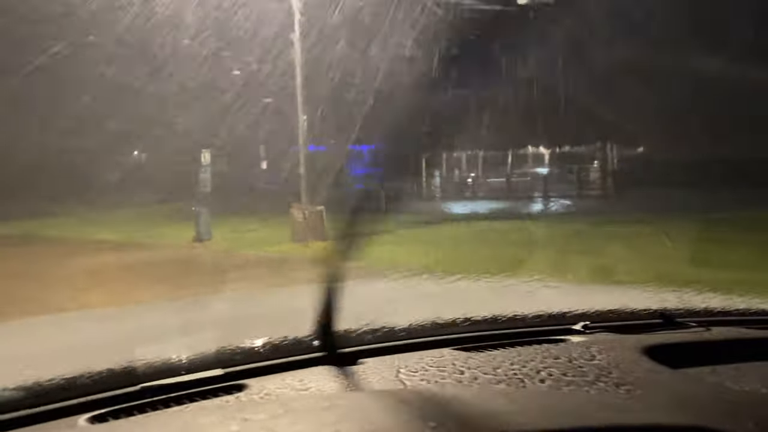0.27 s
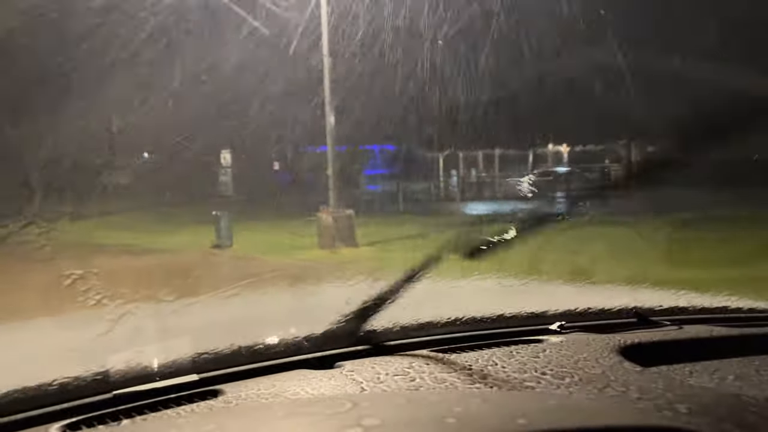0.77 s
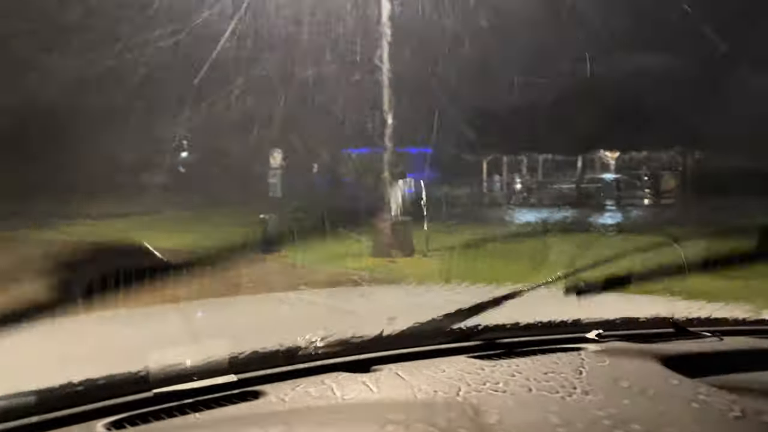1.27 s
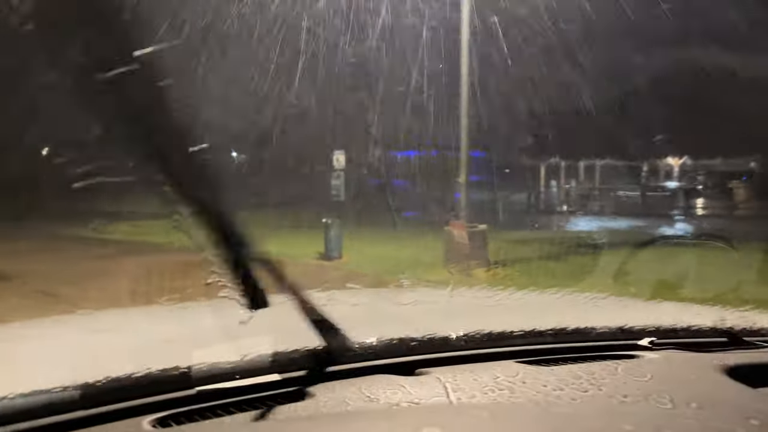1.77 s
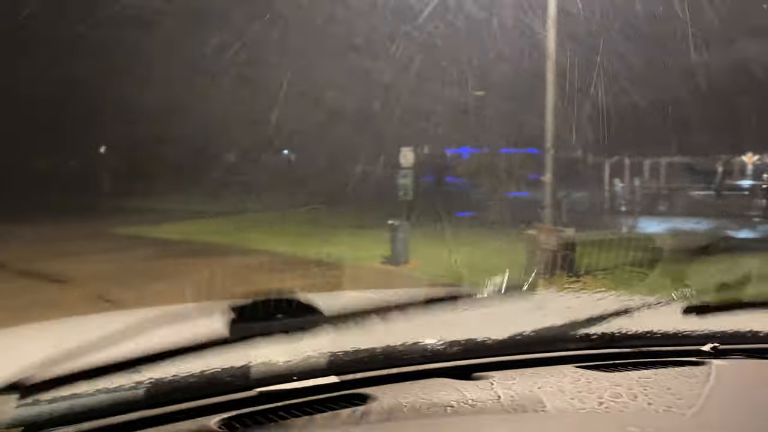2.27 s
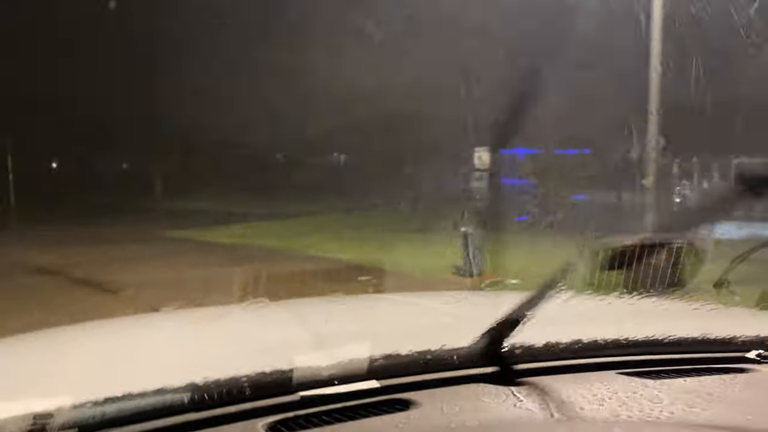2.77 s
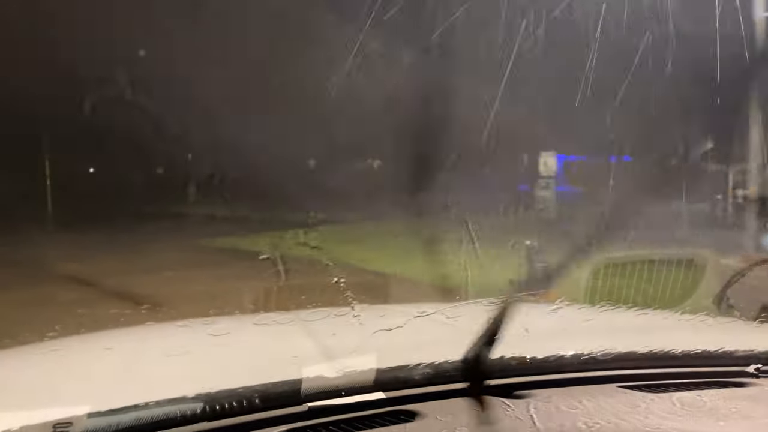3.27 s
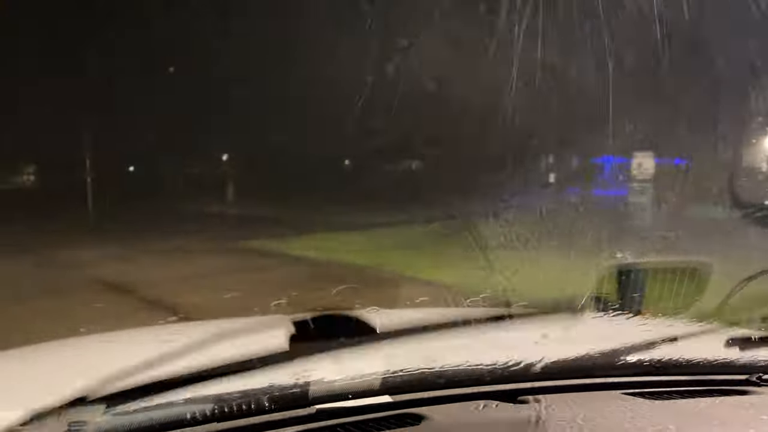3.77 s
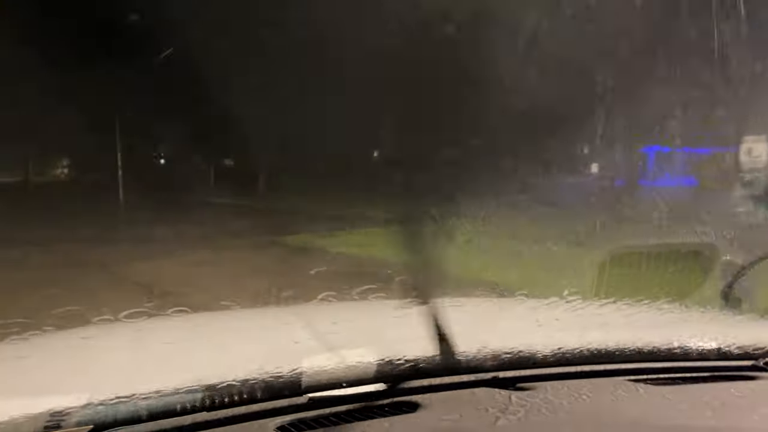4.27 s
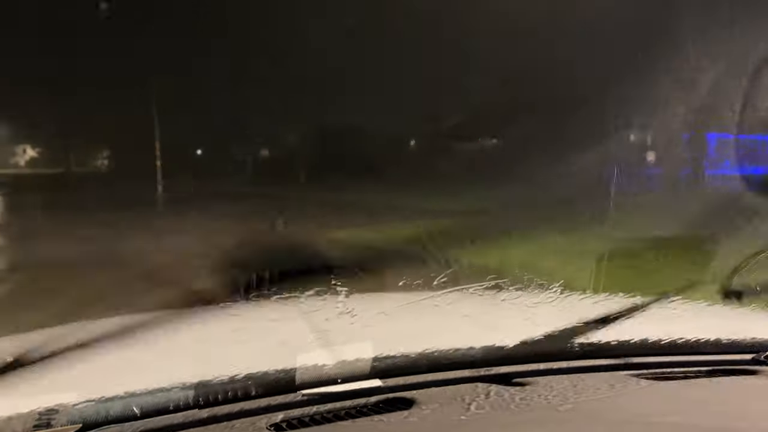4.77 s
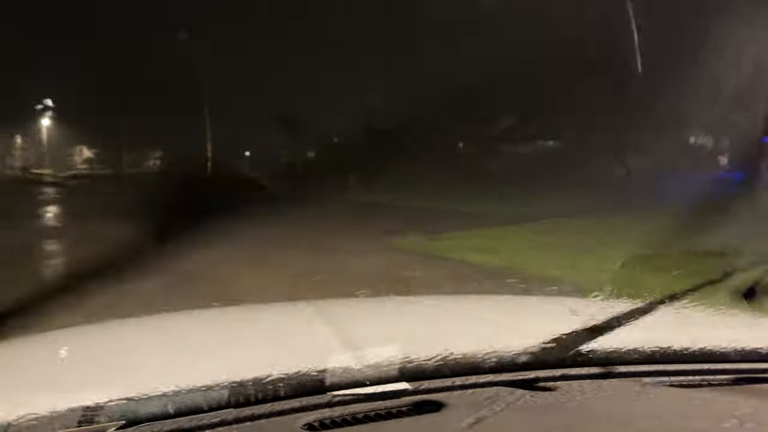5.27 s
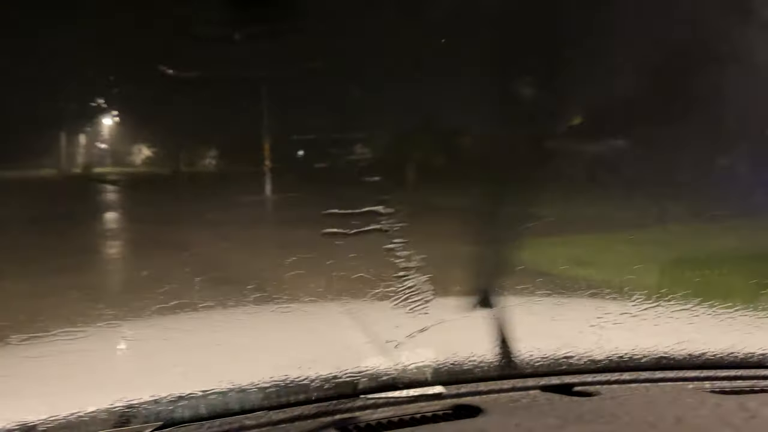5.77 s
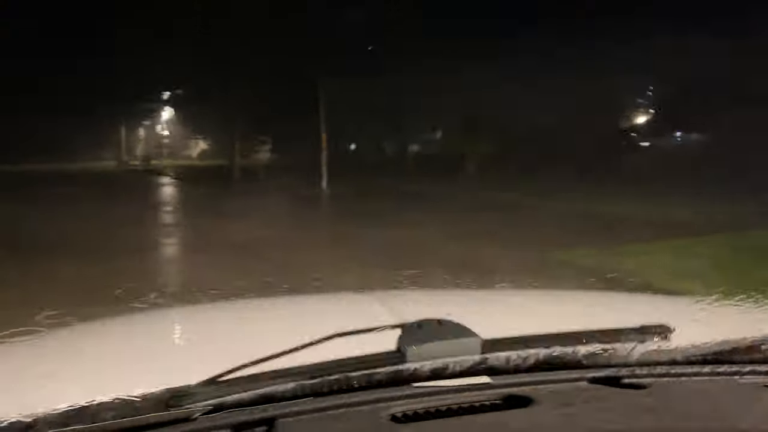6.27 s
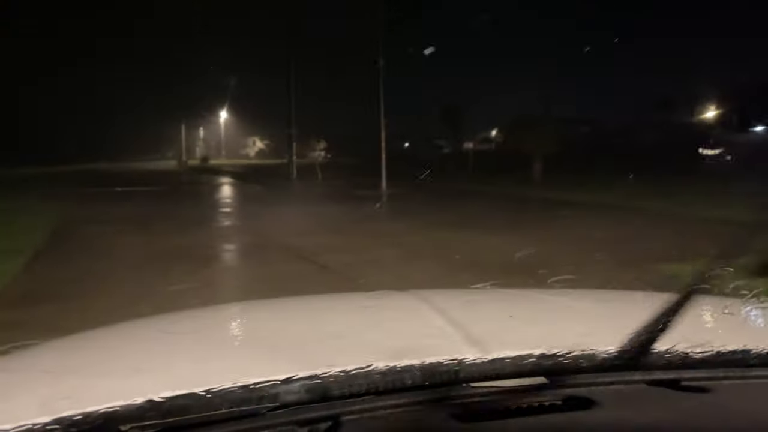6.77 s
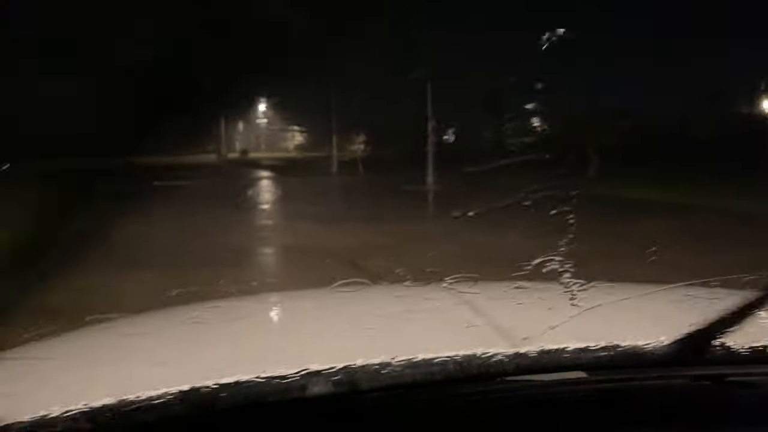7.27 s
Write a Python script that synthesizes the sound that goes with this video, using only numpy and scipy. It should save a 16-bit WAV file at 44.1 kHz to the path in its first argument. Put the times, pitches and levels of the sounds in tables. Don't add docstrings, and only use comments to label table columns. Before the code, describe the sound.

Heard from inside a car creeping through a night storm, with close stereo microphones facing the windscreen. At 0 s a sheet of water drums on glass and roof, draining off within half a second into dense, bright, spattering rain with sharp large drops. Underneath, a steady deep engine drone near 38 Hz and its octave booms in uneven wind buffets, with broad cabin rumble, light engine knocking that grows over two seconds and a very faint high whine. Wipers give soft, dull thuds: single at about 0.5, 1.8, 3.2, 4.4, 5.7 and 7.1 s; paired near 1.1, 2.4, 3.7, 5.0 and 6.3 s. Rain thins from 1.5 s, quietest around 3 s, leaving separate ticks. After 4 s, hissing gusts throw sheets of water again; a strong buffet booms at 5.2 s, drops crowd near 6 s, rain peaks around 6.2 s, then eases by 7.5 s.

```python
import sys
import numpy as np
from scipy import signal
from scipy.fft import rfft, irfft, next_fast_len
from scipy.io import wavfile
from scipy.ndimage import uniform_filter1d

SR = 44100
rng = np.random.default_rng(int(sys.argv[2]) if len(sys.argv) > 2 else 0)


def dump_mix(stems):
    frames = np.atleast_2d(stems).T
    limited = np.clip(frames, -1, 1)
    pcm = np.round(limited * 32767).astype(np.int16)
    wavfile.write(sys.argv[1], SR, pcm)


def ratio(d):
    e = np.asarray(d, float) / 20
    return 10 ** e


N = 332514
SIZE = next_fast_len(N + 8192, True)
BINS_HZ = np.fft.rfftfreq(SIZE, 1 / SR)

# frequency in Hz, level in dB.
RUMBLE_COLOUR = [(30, -57), (52, 2), (90, -8), (200, -8), (300, -9), (430, -15.5), (700, -21),
                 (1000, -19.5), (1500, -23), (1850, -32), (2300, -31.5), (3000, -35.5), (4500, -77),
                 (7000, -72)]
# frequency in Hz, width in Hz, level in dB.
PANEL_MODES = [(262, 53, -3), (334, 18, 4), (630.6, 17, 7), (730, 70, 6), (1605, 120, 0.5),
               (2190, 130, -1.5)]
# frequency in Hz, width in Hz, level in dB.
PAN_MODES = [(118.8, 25.7, 1.5), (138.8, 38.6, -4)]

# time in seconds, firing rate in Hz, level in dB.
ENGINE_IDLE = [(0.0, 37.916, -29.6), (0.63, 38.522, -28.1), (1.26, 38.303, -28.7), (1.88, 38.376, -27.7),
               (2.51, 38.305, -27.5), (3.14, 38.179, -27.6), (3.77, 38.404, -27.5), (4.4, 38.385, -27.8),
               (5.03, 38.73, -28.5), (5.65, 38.633, -29.5), (6.28, 37.939, -26.6), (6.91, 38.069, -26.5),
               (7.54, 38.055, -27.0)]
# multiple of the firing rate, rms level in dB, wander in dB, phase in radians.
UPPER_ORDERS = [(3, -34.5, -3.5, -0.15), (4, -43, -2, 3), (6, -42.5, 4, 0.96)]
# start in seconds, length in seconds, peak level in dB.
BUFFETS = [(-0.01, 0.15, -21.07), (0.139, 0.2, -15.5), (0.35, 0.22, -18.5), (0.586, 0.16, -17.5),
           (0.718, 0.32, -18.05), (1.045, 0.28, -19.5), (1.274, 0.27, -20.5), (1.49, 0.21, -23.5),
           (1.668, 0.2, -17.84), (1.803, 0.52, -21), (2.31, 0.2, -22), (2.465, 0.23, -19.5),
           (2.71, 0.23, -16), (2.96, 0.21, -15.5), (3.122, 0.56, -18.94), (3.607, 0.4, -21),
           (3.91, 0.33, -23.77), (4.189, 0.26, -18.5), (4.402, 0.38, -20.47), (4.703, 0.27, -22.5),
           (4.915, 0.276, -18.5), (5.177, 0.22, -12), (5.349, 0.32, -14.26), (5.635, 0.34, -20.5),
           (5.924, 0.18, -17.02), (6.07, 0.49, -20), (6.462, 0.23, -16.5), (6.688, 0.2, -16),
           (6.888, 0.19, -18.5), (7.03, 0.56, -20)]
# level in dB, factor on the block frequencies.
CYLINDERS = [(-14, 1.07), (0, 1.0), (-1.5, 1.003), (-1, 1.008), (-4, 1.03), (-10, 1.08)]
# frequency in Hz, width in Hz, level in dB,
# delay at the left port in samples, delay at the right port in samples.
BLOCK_MODES = [(1398, 24, .5, 0, 6), (750, 35, -3, 0, 20), (612, 30, -3, 30, 0), (1260, 35, -10, 5, 0),
               (950, 150, 1, 0, 12)]
# frequency in Hz, width in Hz, level in dB.
ALTERNATOR = (5030, 70, -64)

# time in seconds, peak level in dB, low ring in dB,
# rattle length in seconds, off-centre share from 0 to 1.
FAR_THUDS = [(0.537, -14.5, -0.5, 0.036, 0.46), (1.832, -17.5, 5.5, 0.02, 0.4),
             (3.152, -13.5, -1.5, 0.028, 0.44), (4.445, -13.5, 2, 0.044, 0.27),
             (5.74, -14.5, 4, 0.049, 0.28), (7.052, -16, 6, 0.062, 0.27)]
# time in seconds, peak level in dB, low ring in dB,
# rattle length in seconds, off-centre share from 0 to 1.
NEAR_THUDS = [(1.051, -14, -10, 0.061, 0.23), (1.198, -14, -4, 0.094, 0.2), (2.338, -15, -7.5, 0.096, 0.25),
              (2.498, -12.5, -8.5, 0.067, 0.23), (3.658, -13, -16, 0.053, 0.2),
              (3.813, -14, 0, 0.055, 0.14), (4.949, -13.5, -11, 0.082, 0.18),
              (5.109, -11.5, -6.5, 0.078, 0.16), (6.277, -14.5, -3.5, 0.061, 0.19),
              (6.434, -10.5, -0.5, 0.055, 0.14)]
# frequency in Hz, width in Hz, level in dB.
COWL_LOW_MODES = [(136.7, 18.2, 0)]
# frequency in Hz, width in Hz, level in dB.
COWL_MODES = [(228.7, 79, 5.5), (281.5, 43, 2), (331.5, 37.5, 2.5), (417, 60, -6), (544, 98, -8.5),
              (693, 160, -14)]

# time in seconds, peak level in dB.
LARGE_DROPS = [(0.2294, -27), (0.33, -23.5), (0.4515, -23), (0.55, -23), (0.8454, -20.5), (0.894, -27),
               (0.9333, -25), (1.058, -27), (1.2044, -22), (1.924, -29), (2.0664, -24), (2.145, -28),
               (2.8133, -31.5), (3.8641, -26), (4.0102, -24), (4.17, -24), (4.3707, -23), (4.754, -21.5),
               (4.8708, -32.5), (5.3043, -21.5), (5.39, -20), (5.4924, -27), (5.658, -23), (5.8857, -21),
               (5.961, -19), (5.9852, -19), (6.0155, -18), (6.2763, -23), (6.6976, -31), (7.0227, -19.5)]
# time in seconds, peak level in dB.
LULL_DROPS = [(1.595, -31), (1.811, -38), (2.299, -37), (2.5262, -39), (2.6265, -33), (2.7, -36),
              (3.149, -37), (3.1862, -36), (3.248, -35), (3.329, -32), (3.801, -40)]
# time in seconds, level in dB.
STORM = [(0.0, -34), (0.2, -43.5), (0.38, -42.5), (1.3, -46.5), (1.75, -49.5), (2.2, -47.5), (2.6, -48.5),
         (3.0, -55.5), (3.3, -47.5), (3.97, -48.5), (4.03, -43), (4.6, -44), (5.2, -44.5), (5.95, -40.5),
         (6.25, -38), (6.7, -41.5), (7.3, -43.5), (7.54, -48.5)]
# centre in seconds, spread in seconds, dB above the storm.
SHEETS = [(0.19,0.055,6), (0.45,0.027,2.5), (0.65,0.067,5.5), (0.81,0.027,3), (0.88,0.015,-2),
          (0.94,0.04,6), (1.03,0.065,4), (1.22,0.059,5.5), (1.52,0.11,4.5), (1.8,0.015,3.5), (1.97,0.042,4),
          (2.3,0.012,3), (3.19,0.044,-4), (3.35,0.023,3), (4.12,0.014,5), (4.22,0.042,5), (4.4,0.074,5),
          (4.73,0.02,3.5), (5.03,0.098,3), (5.3,0.14,4.5), (5.41,0.013,1.5), (5.71,0.051,4.5),
          (5.88,0.051,3.5), (5.945,0.016,-7), (6.12,0.032,6), (6.44,0.028,2), (6.82,0.044,6),
          (6.94,0.036,4.5), (7.04,0.021,4.5), (7.45,0.054,3.5)]
# frequency in Hz, level in dB.
GLASS_COLOUR = [(250, -26), (500, -12), (1200, -1), (2500, 1), (4000, -4.5), (6000, -10), (6900, -18),
                (8000, -12.5), (10500, -22.5), (11200, -23), (11800, -59)]
# frequency in Hz, level in dB.
ROOF_COLOUR = [(250, -2), (500, 2), (1000, -2), (2000, -26.5), (3200, -39)]
# frequency in Hz, level in dB.
FIZZ_COLOUR = [(5000, -10), (8000, -5), (10800, -0.5), (11500, -3), (12300, -13.5), (12700, -31),
               (13400, -33)]

# frequency in Hz, share from 0 to 1.
DIRECT_SHARE = [(60, .99), (140, .92), (310, .78), (500, .3), (1700, .12), (2300, .52), (4000, .77),
                (5400, .42), (6300, .7), (6900, .4), (8500, .95), (10200, .995), (11450, .83), (11900, .96)]
# frequency in Hz, lead of the left port in radians.
LEFT_LEAD = [(1600, 0), (2300, .3), (3100, 1.1), (4300, .5), (5200, .8), (6900, .15), (7500, 1.0),
             (8700, 0), (9200, -1.1), (10200, -3.14), (11700, -6.283)]
# frequency in Hz, left minus right in dB.
LEFT_TILT = [(90, -.3), (140, 2), (310, .5), (700, 0), (1600, -1.5), (2420, 0), (3640, 2.5), (5000, 4),
             (7000, 3), (8000, .3), (9000, 0)]


def evened(x):
    return x / np.sqrt(np.mean(x ** 2) + 1e-20)


def read(points, hz):
    f, value = np.transpose(points)
    return np.interp(np.log(hz + 1), np.log(f + 1), value)


def along(rows):
    s, *columns = np.transpose(rows)
    return [np.interp(np.arange(N) / SR, s, column) for column in columns]


def drift(rate_hz):
    slow = signal.butter(2, rate_hz, fs=SR, output="sos")
    return evened(signal.sosfilt(slow, rng.standard_normal(N)))


def coloured(x, points):
    return evened(irfft(rfft(x, SIZE) * ratio(read(points, BINS_HZ)), SIZE)[:N])


def ring(x, hz, width):
    turn = np.exp(2j * np.pi * hz * np.arange(x.shape[-1]) / SR)
    r = np.exp(-np.pi * width / SR)
    return 2 * (turn * signal.lfilter([1 - r], [1, -r], x / turn)).real


def add(mix, s, sound):
    part = mix[..., round(s * SR):][..., :sound.shape[-1]]
    part += sound[..., :part.shape[-1]]


def ports(x, t60):
    t = np.arange(8192) / SR
    tails = rng.standard_normal((2, len(t))) * ratio(-60 * t / t60)
    tails = rfft(tails / np.linalg.norm(tails, axis=1, keepdims=True), SIZE)
    share = read(DIRECT_SHARE, BINS_HZ)
    half = np.array([[.5], [-.5]])
    direct = np.sqrt(share) * np.exp(1j * half * read(LEFT_LEAD, BINS_HZ))
    paths = direct + np.sqrt(1 - share) * tails
    balance = ratio(half * read(LEFT_TILT, BINS_HZ))
    return irfft(rfft(x, SIZE) * paths * balance, SIZE)[:, :N]


def rumble():
    body, pan = np.zeros((2, N)), np.zeros((2, N))
    for _ in range(4):
        x = coloured(rng.standard_normal(N), RUMBLE_COLOUR)
        push = rng.standard_normal(N)
        x = x + sum((ratio(db) - 1) * ring(x, hz, width) for hz, width, db in PANEL_MODES)
        body += ports(x * ratio(1.3 * drift(9.0)), .2)
        boom = sum(ratio(db) * ring(ring(push, hz, w), hz, 2 * w) for hz, w, db in PAN_MODES)
        pan += ports(boom, .2)
    pan_db = -30 - 0.29 * (along(STORM)[0] + 47) + 1.5 * drift(3.3)
    return ratio(-30) * evened(body) + ratio(pan_db) * evened(pan)


def buffets():
    t = np.arange(0, N, 64) / SR
    arches = np.zeros(len(t))
    for s, length, db in BUFFETS:
        arch = abs(np.sin(np.pi * np.clip((t - s) / length, 0, 1)))
        arches += ratio(db) * arch ** 0.71
    return np.interp(np.arange(N) / SR, t, arches)


def knock(turns):
    firing = np.floor(turns - .14)
    at = np.flatnonzero(np.diff(firing))
    cylinder = firing[at + 1].astype(int) % len(CYLINDERS)
    scatter = rng.standard_normal((len(at), 2))
    t, out = np.arange(2000) / SR, np.zeros((2, N))
    for i, c, (louder, sharper) in zip(at, cylinder, scatter):
        db, factor = CYLINDERS[c]
        pitch = factor * (1 + 0.00089 * sharper + 0.029 * (i / N) ** 3)
        for hz, width, mode_db, *late in BLOCK_MODES:
            age = np.maximum(t - np.array(late)[:, None] / SR, 0)
            swell = (1 - np.exp(-age / 0.00055)) * np.exp(-np.pi * width * age)
            tone = np.sin(2 * np.pi * hz * pitch * age)
            add(out, i / SR, ratio(db + mode_db + 1.2 * louder) * swell * tone)
    eased_db, loaded_s = -7, 2.0
    load = np.minimum(np.arange(N) / SR / loaded_s, 1) ** 2
    return ratio(-43.3 + eased_db * (1 - load)) * evened(out) * ratio([[-1.5], [1.5]])


def alternator():
    hz, width, db = ALTERNATOR
    hiss = rng.standard_normal((2, N))
    return ratio(db) * evened(ring(ring(hiss, hz, width), hz, 2 * width))


def engine():
    hz, level_db = along(ENGINE_IDLE)
    turns = -.322 + np.cumsum(hz) / SR
    angle = 2 * np.pi * turns
    out = ratio(level_db + 0.86 * drift(4.8)) * np.cos(angle)
    out += buffets() * np.cos(2 * angle + 2.8 + 0.4 * drift(3.2))
    for k, db, wander_db, phase in UPPER_ORDERS:
        strength = ratio(db + wander_db * drift(6.0))
        out += strength * np.cos(k * angle + phase + 1.04 * drift(7.3))
    return np.sqrt(2) * out * ratio([[-.1], [.1]]) + knock(turns) + alternator()


def thud(db, low_db, length, aside):
    t = np.arange(round(.3 * SR)) / SR
    shape = (1 - np.exp(-t / 0.0077)) * np.exp(-(t / length) ** 3)
    place, size = rng.random((2, 2, 40))
    at = ((np.arange(40) + place) * 260).astype(int)
    blows = np.sign(size - .5) * (.6 + abs(size - .5))
    knocks = np.zeros((2, len(t)))
    np.put_along_axis(knocks, at, blows, 1)
    rubber = np.hanning(60)[None]
    knocks = signal.oaconvolve(knocks * shape, rubber)[:, :len(t)]
    high = sum(ratio(d) * ring(ring(knocks, hz, w), hz, 3.46 * w) for hz, w, d in COWL_MODES)
    low = sum(ring(ring(knocks, hz, w), hz, 3.2 * w) for hz, w, _ in COWL_LOW_MODES)
    centre, edge = (h / abs(h).max() + ratio(low_db) * l / abs(l).max() for h, l in zip(high, low))
    return ratio(db) * np.array([0.97 * centre + aside * edge, 0.75 * centre - aside * edge])


def wipers():
    out = np.zeros((2, N))
    for s, *blow in [*FAR_THUDS, *NEAR_THUDS]:
        add(out, s - .012, thud(*blow))
    return out


def drops():
    t, out = np.arange(500) / SR, np.zeros(N)
    when, size = rng.random((36, 2)).T
    when = when * (N - 2000) / SR
    stray_db = np.interp(when, *np.transpose(STORM)) + 13.0 + 3.0 * (2 * size - 1)
    rows = np.r_[LARGE_DROPS, LULL_DROPS, np.c_[when, stray_db]]
    noise = rng.standard_normal((len(rows), len(t)))
    spot_hz = 2920 + (4480 - 2920) * rng.random(len(rows)) ** 2
    rise = np.minimum(t / .0004, 1)
    for (s, db), puff, hz in zip(rows, noise, spot_hz):
        tick = 0.36 * puff * np.exp(-t / .0012)
        splat = .6 * ring(puff * np.exp(-t / .002), hz, 3000.0)
        add(out, s, ratio(db) * rise * (tick + splat))
    body = signal.butter(4, (1500, 11200), "bandpass", fs=SR, output="sos")
    return ratio(3.0) * ports(signal.sosfilt(body, out), .05)


def sheets():
    t = np.arange(0, N, 64) / SR
    bells = sum(db * np.exp(-.5 * ((t - s) / spread) ** 2) for s, spread, db in SHEETS)
    return np.interp(np.arange(N) / SR, t, bells)


def rain():
    gust_db = sheets()
    level_db = along(STORM)[0] + gust_db
    sheet = ratio(level_db + 1.06 * drift(55.0))
    bright = ratio(0.57 * (level_db + 36.0) - 6.0 + 0.71 * drift(30.0))
    splash_db = 7 * np.exp(-(np.arange(N) / SR / 0.58) ** 2)
    roof_db = -4.5 + splash_db - 0.24 * gust_db
    heavy = ratio(roof_db + 2.4 * drift(7.4) + 2.0 * drift(34.0))
    t, out = np.arange(400) / SR, np.zeros((2, N))
    for splash_s in (.0003, .0004, .0006, .0008, .0012, .0017):
        struck = rng.random(N) < 500 / SR
        size = ratio(5.17 * np.minimum(rng.exponential(1, N), 4.5)) * struck
        taps = signal.oaconvolve(size, np.exp(-t / splash_s))[:N] * rng.standard_normal(N)
        spray = evened(taps) + 0.84 * rng.standard_normal(N)
        layers = coloured(spray, GLASS_COLOUR)
        layers += heavy * coloured(spray, ROOF_COLOUR)
        layers += bright * coloured(spray, FIZZ_COLOUR)
        out += ports(sheet * layers, .07)
    return ratio(-7.0) * out


def scene():
    return rumble() + engine() + wipers() + drops() + rain()


def roll_off(x):
    return signal.sosfilt(signal.butter(12, 13090, fs=SR, output="sos"), x)


def record(dry):
    turn = np.array([[1, 0.95], [1, -1.025]]) / np.sqrt(2)
    hz, _, z = signal.stft(turn @ dry, SR, nperseg=1024)
    power = uniform_filter1d(abs(z) ** 2, size=7, axis=1)
    power = uniform_filter1d(power, size=2, axis=2)
    from_hz, faint_db = 8400, -16.5
    strongest = power[:, hz > from_hz].max((0, 1))
    z = z * ((power > ratio(2 * faint_db) * strongest) | (hz[:, None] < from_hz))
    kept = turn @ signal.istft(z, SR, nperseg=1024)[1][:, :N]
    edge = signal.firwin(255, 12900, window=("kaiser", 9), fs=SR)
    mix = signal.oaconvolve(kept, edge[None], "same")
    return roll_off(mix)


dry = scene()
out = record(dry)
dump_mix(out)
```